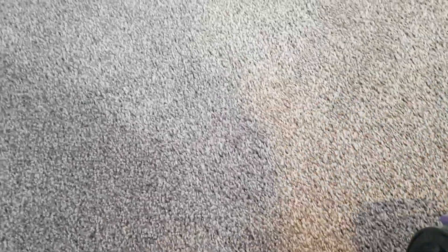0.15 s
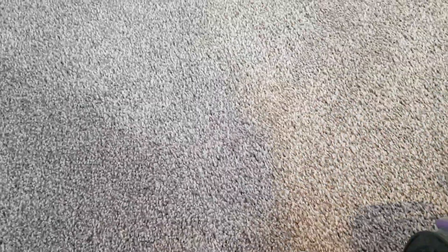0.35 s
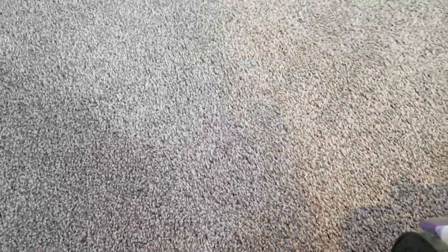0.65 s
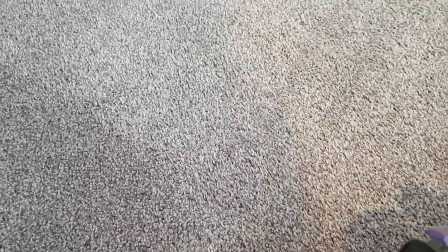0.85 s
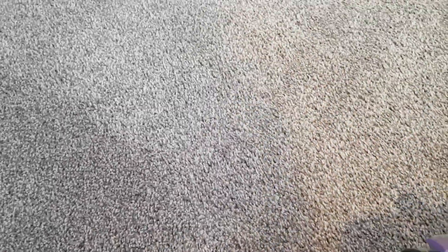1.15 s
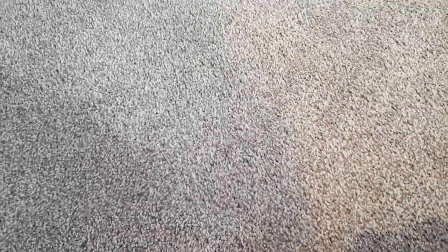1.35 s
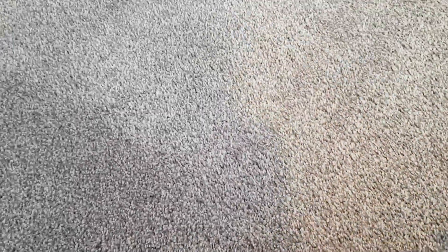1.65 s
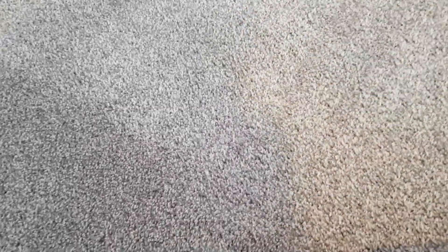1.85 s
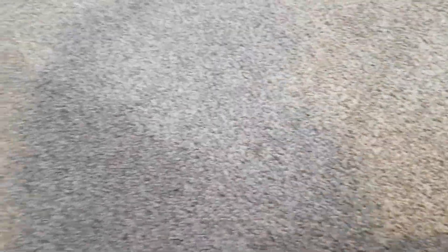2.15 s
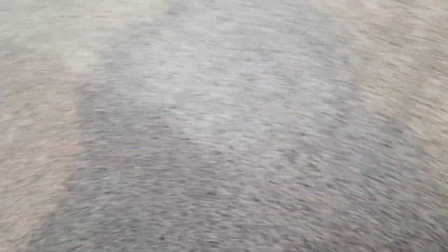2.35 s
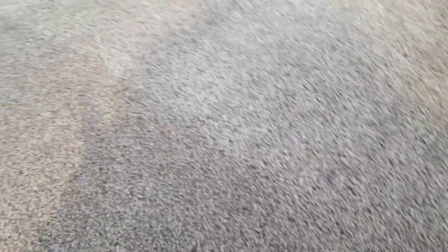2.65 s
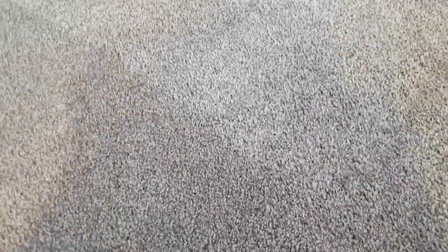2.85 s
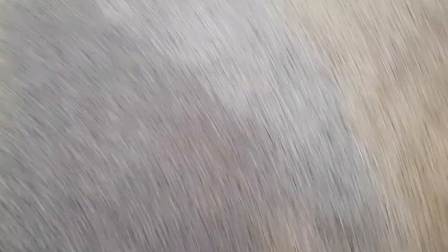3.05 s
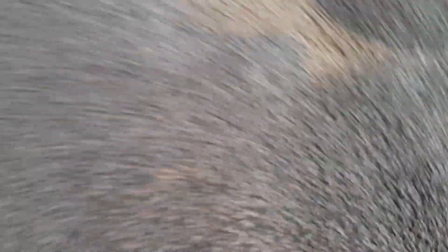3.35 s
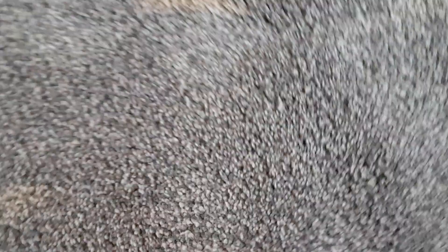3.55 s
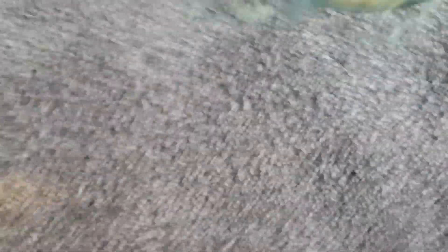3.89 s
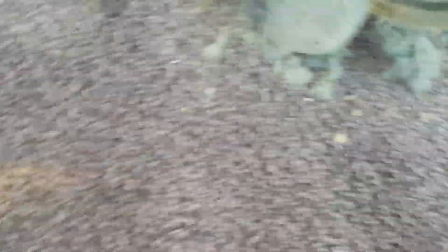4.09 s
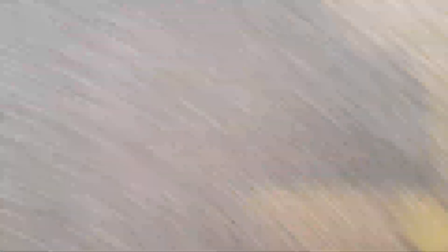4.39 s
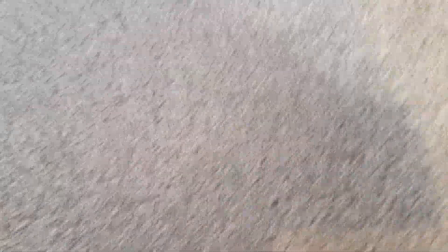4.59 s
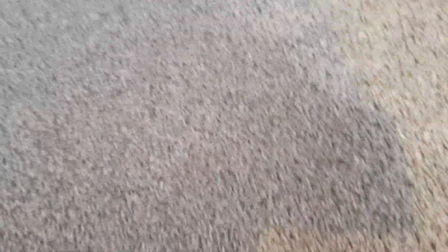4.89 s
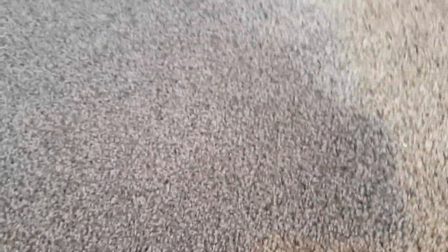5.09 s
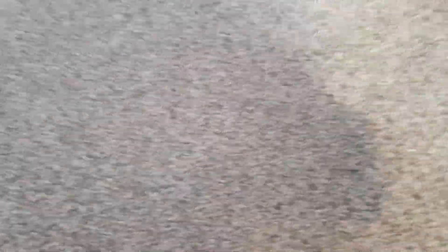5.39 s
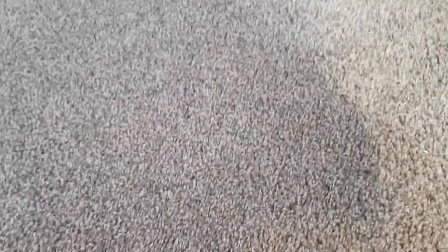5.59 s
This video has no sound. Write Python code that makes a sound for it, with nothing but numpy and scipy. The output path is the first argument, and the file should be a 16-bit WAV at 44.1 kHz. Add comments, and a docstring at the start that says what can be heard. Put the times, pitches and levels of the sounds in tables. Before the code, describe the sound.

Faint rustles and plastic ticks, then a sharp snap of a catch and rattling knocks as a silent vacuum cleaner is handled.

```python
"""Handling a switched-off vacuum cleaner

An upright vacuum cleaner is shifted about on carpet in a quiet home, close to the listener.
Its plastic shell knocks and ticks, a catch snaps home with a loud clack and loose parts rattle,
all ringing the same body modes. Cloth and carpet rustle. The room answers each knock, over a bed
of faint mains hum, a distant drone and hiss."""
import sys
import numpy as np
from scipy import signal
from scipy.fft import rfft, irfft, next_fast_len
from scipy.io import wavfile
from scipy.ndimage import map_coordinates

SR = 44100
rng = np.random.default_rng(int(sys.argv[2]) if len(sys.argv) > 2 else 0)


def unload_wav(signal):
    """Save mono or channel-first audio to the path in sys.argv[1] as 16-bit WAV at rate SR, clipped to [-1, 1]."""
    wavfile.write(
        sys.argv[1],
        SR,
        np.round(np.clip(np.atleast_2d(signal).T, -1, 1) * 32767).astype(np.int16),
    )


N = 252693

# The modes the machine rings with, before a grip damps them: pitch_hz, level_db, t60_s
BODY_MODES = [(111, 11.5, 0.035), (133.6, 1, .16), (163, 1, 0.1), (230, -2, 0.077), (290, 2.5, 0.088),
              (430, -2.5, 0.16), (500, 3.5, 0.068), (546.3, 1.5, 0.12), (650, 1.5, 0.11), (740, 2, .17),
              (865, -3, 0.042), (920, 2.5, 0.28), (1077, 1, 0.09), (1292, -2, .05), (1650, -8.5, 0.11),
              (1670, -4.5, 0.066), (2223, -10.5, 0.017), (2457, 3, 0.031), (2660, 0.5, 0.039),
              (2830, 1, 0.087), (3225, 1.5, 0.032), (3790, 7.5, 0.035), (4583, 7, 0.035), (5400, -1, 0.014),
              (7130, -8.5, 0.055), (8480, 1, .05), (11100, -7, .015), (14660, -0.5, .12)]
# Band limits of its five parts (base, shell, catch, clips, edges): limit_hz
PART_LIMITS_HZ = [60, 250, 1100, 4000, 8000, 15000]
# Where the machine sits in the stereo image: time_s, left_lag_ms, left_over_right_db
BEARING = [(0, 0.066, 3), (2.5, 0.17, -0.5), (3.7, .1, 3.5), (3.75, -0.18, 2), (3.85, -0.14, 3.5),
           (3.87, .05, -2), (3.89, -0.088, 3), (4.0, -0.089, 1.5), (4.09, 0.34, -1), (5.73, 0.41, .5)]


def knocks():
    """Each contact is a blow and a grinding burst of force; it rings the modes near the spot's pitch."""
    # Contacts: start_s, thud_db, shell_db, clack_db, tick_db, shell_hz, clack_hz, grind_s
    contacts = [(1.1958, -62, -54.5, -65, -83, 290, 1204, .015),
                (1.2254, -73, -69, -61, -94, 510, 1900, .021),
                (1.2314, -62, -60, -57, -78, 750, 2960, 0.14),
                (1.2505, -55, -36, -37, -49, 775, 2110, 0.011),
                (1.2715, -73, -50, -44.5, -57, 800, 1292, .03),
                (1.6188, -72, -62.5, -62, -97, 650, 1160, 0.065),
                (1.6504, -85, -64, -68, -84, 720, 1630, 0.045),
                (1.9454, -67.5, -66.5, -64, -86, 250, 2310, 0.024),
                (2.151, -80, -73, -65, -91, 380, 2800, 0.02),
                (2.339, -62, -56.5, -76, -74, 282, 1230, 0.029),
                (2.5613, -56.5, -57, -63, -76, 430, 2100, 0.018),
                (2.5874, -79, -65, -70, -80, 660, 1230, .045),
                (2.6879, -63, -62, -67, -76, 248, 1430, 0.06),
                (2.891, -79, -64, -69, -85, 740, 1430, 0.029),
                (2.9609, -68.5, -60, -67.5, -91, 583, 1240, 0.023),
                (3.315, -74, -63.5, -77, -74.5, 457, 1580, 0.027),
                (3.7043, -45.5, -44, -49, -57, 550, 1110, 0.18),
                (3.7098, -49, -43.5, -45.5, -60, 636, 1080, 0.033),
                (3.7538, -56, -51, -39, -81, 332, 1350, 0.0061),
                (3.7797, -61, -42.5, -41, -58, 1070, 1140, 0.06),
                (3.793, -50.5, -41, -36, -50.5, 516, 2060, 0.06),
                (3.8243, -45, -41.5, -36, -34.5, 250, 3250, .006),
                (3.8586, -52, -44, -54, -49, 930, 3770, 0.12),
                (3.8665, -62, -39.5, -23.5, -47, 895, 3790, 0.0088),
                (3.8769, -35, -27.5, -27.5, -42, 480, 1780, 0.074),
                (3.8941, -45, -19, -13, -27, 926, 2920, .04),
                (3.942, -57.5, -33, -35, -39, 480, 2840, 0.047),
                (3.9779, -45, -33.5, -33.5, -45, 506, 2730, 0.018),
                (3.991, -68, -58, -41, -38, 490, 3200, 0.046),
                (4.0078, -49, -60, -44, -52.5, 920, 2810, 0.022),
                (4.051, -61, -52, -47.5, -58.5, 1080, 2790, .037),
                (4.0571, -52, -53, -48.5, -55, 1080, 1270, 0.016),
                (4.0865, -63, -77, -60.5, -57, 895, 2820, 0.042),
                (4.1171, -78, -70, -63.5, -65.5, 423, 2970, .08),
                (4.1496, -82, -76.5, -51.5, -59.5, 290, 4280, .027),
                (4.263, -64, -49, -62.5, -71, 740, 2790, .08),
                (4.3285, -62.5, -50, -55.5, -70, 303, 2830, 0.024),
                (4.4175, -68, -69, -61.5, -66, 684, 2820, 0.25),
                (4.435, -61, -45.5, -50, -63, 554, 2457, 0.11),
                (4.5068, -73.5, -73, -51, -56.5, 419, 2830, .032),
                (4.6932, -72, -53, -56.5, -85.5, 688, 1390, 0.021),
                (4.768, -77, -53.5, -59.5, -84.5, 525, 1650, 0.021),
                (4.794, -71, -51.5, -60, -74, 563, 1250, 0.04),
                (4.8375, -43.5, -44, -49.5, -64, 650, 1260, 0.062),
                (4.852, -49.5, -52, -51, -61, 290, 1700, 0.052),
                (4.908, -65.5, -65, -68, -77, 247, 1970, 0.091),
                (5.019, -50, -44.5, -42.5, -66, 684, 2830, 0.042),
                (5.026, -48, -46, -42, -64, 290, 2660, 0.0378),
                (5.0491, -52, -41.5, -36.5, -66, 500, 2700, 0.022),
                (5.082, -66, -47.5, -47.5, -79, 487, 1670, 0.023),
                (5.119, -61, -45.5, -47.5, -92.5, 745, 2660, 0.21),
                (5.1761, -66, -56, -58, -88, 520, 1650, 0.012),
                (5.2335, -63, -53.5, -48, -76.5, 370, 2660, 0.063),
                (5.344, -71.5, -60.5, -64.5, -88.5, 352, 1120, 0.039),
                (5.4072, -39, -45, -51.5, -66, 652, 2530, 0.083),
                (5.4395, -44, -42.5, -38.5, -76, 500, 2600, 0.11),
                (5.4653, -56, -42.5, -43.5, -91, 520, 2800, 0.051),
                (5.5207, -66, -52.5, -51.5, -95, 710, 2550, .046),
                (5.5467, -62, -53.5, -56.5, -94, 305, 1670, 0.068),
                (5.6178, -54, -49.5, -55, -70, 690, 2660, 0.056),
                (5.6305, -50.5, -53.5, -42.5, -60.5, 290, 2840, 0.045),
                (5.6525, -56, -41.5, -40.5, -67, 635, 1950, 0.17)]
    # How the machine stands after each shift: start_s, thud_hz, freedom_to_ring (0-1)
    stances = [(0, 160, 0.4), (3.8, 106.6, 0.69), (4.2, 244, 0.54), (4.82, 127, 0.37)]
    usual_tick_db, usual_clack_db = -58, -44
    thud_delay = round(0.006 * SR)  # the base meets the carpet just after the contact
    # One row a part, base to edges; left and right hear different sides of the small bright parts.
    spread = np.array([[0.05], [0.12], [0.25], [0.45], [0.45]])
    grind_scale = np.array([[1.1], [1.1], [0.9], [0.75], [0.6]])
    grit_db = np.array([[-11], [-7], [-1.5], [1.5], [4]])
    out, t = np.zeros((2, N + SR)), np.arange(SR // 3) / SR
    mode_hz = np.transpose(BODY_MODES)[0]
    scatters_db = 2 * rng.standard_normal((len(contacts), len(BODY_MODES)))
    bursts = rng.standard_normal((len(contacts), 2, 5, len(t)))
    lag_ms, pan_db = curves(BEARING)
    for contact, scatter_db, burst in zip(contacts, scatters_db, bursts):
        start_s, thud_db, shell_db, clack_db, tick_db, shell_hz, clack_hz, grind_s = contact
        _, thud_hz, freedom = [stance for stance in stances if stance[0] <= start_s][-1]
        fizz_db = usual_tick_db - 6.5 + 0.91 * (tick_db - usual_tick_db)  # edges fizz under the tick
        levels_db = np.array([thud_db, shell_db, clack_db, tick_db, fizz_db])
        # A weak tick means a soft, slow contact; a loud clack means a hard, fast one.
        softness = (shell_db - tick_db) / 17.5 - (clack_db - usual_clack_db) / 25.5
        rise_s = np.clip(0.00058 * 2 ** softness, 0.0002, 0.005)
        t60_s = np.clip(grind_s, 0.004, 0.15) * grind_scale
        mid, side = burst * amp(-60 * t / t60_s) * (1 - np.exp(-t / rise_s))
        blow = mid / np.linalg.norm(mid, axis=1, keepdims=True)
        blow[:, 0] = 0.0033 / rise_s  # the sharper the contact, the harder its first blow
        octaves_off = np.min([abs(np.log2(mode_hz / hz)) for hz in (thud_hz, shell_hz, clack_hz)], axis=0)
        excite_db = -19 * octaves_off * (mode_hz < PART_LIMITS_HZ[3]) + scatter_db
        ring = unit_attack(filtered(blow, lambda f: body_ring(f, excite_db, freedom)))
        at = round(start_s * SR)
        for channel, sign in enumerate((1, -1)):
            grit = unit_attack(filtered(mid + sign * spread * side, crunch))
            parts = unit_attack(ring + amp(grit_db) * grit)
            parts[0] = np.pad(parts[0], (thud_delay, 0))[:len(t)]
            arrival = round((start_s + sign * lag_ms[at] / 2000) * SR)  # half the lag each side
            out[channel, arrival:][:len(t)] += amp(levels_db + sign * pan_db[at] / 2) @ parts
    return out[:, :N]


def rattle():
    """Loose parts chatter and scrape: dense, uneven grains of force into the same body."""
    # Swell of the rattle: time_s, level_db, treble_offset_db
    swell = [(3.66, -76, -3), (3.78, -47, -25.5), (3.845, -59, -20.5), (3.88, -50, -5), (3.96, -48, 2),
             (4.03, -45.5, -11), (4.1, -68, 4), (4.18, -79.5, 5), (4.55, -76, -6), (4.77, -63, -17),
             (4.92, -62, -5), (5.01, -71.5, -6.5), (5.19, -69.5, -18.5), (5.48, -68, -18), (5.73, -49, -22)]
    # Balance of shell, catch, clips and edges: gain_db
    balance_db = [-5.5, -8, -8.5, -9.5]
    grains = rng.standard_normal((5, N)) * amp(3.5 * wobble(90) + 1.9 * wobble(28))
    rings = filtered(grains, lambda f: body_ring(f, np.zeros(len(BODY_MODES)), freedom=0.22))
    scrapes = filtered(grains, crunch)
    level_db, treble_db = curves(swell, outside=-120)
    levels_db = [level_db, level_db, level_db + treble_db, level_db + treble_db]
    chatter = sum(amp(db + part_db) * (unit(ring) + amp(-1) * unit(scrape))
                  for db, part_db, ring, scrape in zip(levels_db, balance_db, rings[1:], scrapes[1:]))
    half_lag = curves(BEARING)[0] * SR / 2000  # samples; follows the machine's bearing
    return np.array([map_coordinates(chatter, [np.arange(N) - sign * half_lag]) for sign in (1, -1)])


def body_ring(f, excite_db, freedom):
    """The modal response of each part; a grip shortens the ring of all but the base."""
    parts = np.zeros((5, len(f)), complex)
    for k, (hz, db, t60_s) in enumerate(BODY_MODES):
        ring_scale = 1 if hz < PART_LIMITS_HZ[1] else np.clip(freedom, 0.1, 1.5)
        width_hz = np.log(1000) / (np.pi * t60_s * ring_scale)
        part = np.searchsorted(PART_LIMITS_HZ, hz) - 1
        parts[part] += (-1) ** k * amp(db + excite_db[k]) * resonance(f, hz, width_hz)
    return parts * radiation(f)


def crunch(f):
    """The broad, heavily damped response of each part."""
    bands = zip(PART_LIMITS_HZ, PART_LIMITS_HZ[1:])
    return [resonance(f, np.sqrt(lo * hi), 1.13 * (hi - lo)) ** 2 for lo, hi in bands] * radiation(f)


def resonance(f, hz, width_hz):
    """One resonance whose ring starts at the same strength whatever its width."""
    return 1j * f / (hz * hz - f * f + 1j * f * width_hz)


def radiation(f):
    """Each part radiates little far above or below its own band."""
    low_hz, high_hz = 0.96 * np.array([PART_LIMITS_HZ[:-1], PART_LIMITS_HZ[1:]])[..., None]
    return 1j * f / (low_hz + 1j * f) / (1 + 1j * f / high_hz) ** 2


def rustle():
    """Cloth rubs in short strokes: a swish, a duller drag and a fine hiss, all grainy."""
    # Cloth strokes: start_s, length_s, level_db, drag_offset_db, hiss_offset_db
    strokes = [(.365, 0.062, -68.5, -7, -8), (0.547, 0.034, -75, -2, -17), (1.528, 0.047, -76, -4, -5),
               (1.722, 0.029, -72.5, -3, -8.5), (2.205, 0.036, -76, -19, 7),
               (2.338, 0.019, -69.5, 1.5, -11), (2.453, 0.06, -63, -1, -6.5), (2.64, 0.047, -65, 2, -2),
               (2.897, 0.044, -77.5, -2, -8), (3.308, 0.01, -82.5, -4.5, 9.5),
               (3.514, 0.039, -78, -9, -11.5)]
    # Tone colours of the three layers: frequency_hz, density_db
    swish = [(1200, -30), (1900, -5), (2500, 0), (3600, -2), (4400, -14), (7000, -35)]
    drag = [(400, -13.5), (800, -5), (1400, -10), (2000, -2), (3000, -23)]
    hiss = [(3000, -17.5), (5500, -3), (8000, 0), (10000, -11), (12500, 0), (16000, -9.5)]
    rise_s, fade_lengths = 0.075, 7.6  # to climb and to fall by 60 dB
    t, gains = np.arange(N) / SR, np.zeros((3, N))
    for start_s, length_s, level_db, drag_db, hiss_db in strokes:
        attack_db = -60 * np.maximum(start_s - t, 0) / rise_s
        release_db = -60 * np.maximum(t - start_s - length_s, 0) / (fade_lengths * length_s)
        gains += amp(level_db + attack_db + release_db + np.array([[0], [drag_db], [hiss_db]]))
    grain = amp(1.3 * wobble(86))
    return grain * sum(gain * stereo_noise(colour) for gain, colour in zip(gains, (swish, drag, hiss)))


def room_echo(x):
    """A short reverb whose treble dies first; the echo pattern keeps shifting, as for a moving source."""
    # Decay of the room: frequency_hz, t60_s
    decay = [(100, 0.4), (500, 0.18), (2000, 0.15), (8000, 0.091), (15000, 0.066)]
    hz, t, noise = signal.stft(rng.standard_normal((6, 2, SR // 2)), SR, nperseg=256)
    tails = signal.istft(noise * amp(-60 * t / along(decay, hz)[:, None]), SR, nperseg=256)[1]
    tails /= np.linalg.norm(tails, axis=2, keepdims=True)
    active = np.arange(N) // (SR // 100) % len(tails)  # the next tail is fed every 10 ms
    wet = sum(signal.fftconvolve(x * (active == k), tail, axes=1) for k, tail in enumerate(tails))
    wet += filtered(wet.mean(0) - wet, lambda f: 1 / (1 + 1j * f / 150))  # long waves reach both sides alike
    return np.pad(wet, ((0, 0), (200, 0)))[:, :N]  # pre-delay


def room_tone():
    """The background bed: wavering mains hum, a distant drone, low rumble and microphone hiss."""
    # Hum partials near multiples of the mains: pitch_hz, rms_db
    partials = [(102.3, -82), (199.2, -85), (301.5, -84), (597.5, -87), (699.8, -85)]
    # The drone swells and fades: time_s, level_db
    swell = [(0.0, -78), (0.49, -79), (0.66, -69), (1.21, -92), (1.4, -76.5), (2.02, -71.5), (2.41, -78.5),
             (2.65, -68.5), (3.03, -80.5), (3.68, -74.5)]
    # Tone colours of rumble, hiss and drone: frequency_hz, density_db
    rumble_colour = [(12, -33.5), (20, -6.5), (27, -16), (97, -8.5), (129, -12.5), (297, -10.5),
                     (326, -19.5), (395, -12), (514, -14.5), (684, -9.5), (828, -14.5), (1580, -15.5),
                     (2370, -18.5), (6000, -30), (7800, -65.5), (13200, -120)]
    hiss_colour = [(3530, -25.5), (6000, -5), (9800, -4), (13400, -1), (15100, -0.5), (16100, -4),
                   (16500, -22.5)]
    drone_colour = [(250, -44), (330, -8), (380, -3.5), (470, -10), (600, -40)]
    t = np.arange(N) / SR
    hum = sum(np.sqrt(2) * amp(db + 1.4 * wobble(9.9)) * np.sin(2 * np.pi * hz * t + wobble(8.9))
              for hz, db in partials)
    drone = amp(curves(swell)[0] + 2.5 * wobble(12)) * stereo_noise(drone_colour)
    rumble = amp(-69 + 0.48 * wobble(2.6)) * stereo_noise(rumble_colour)
    hiss = amp(-78) * stereo_noise(hiss_colour)
    return rumble + hiss + hum + drone


def stereo_noise(colour):
    """Coloured noise at rms 1, as alike left and right as the room makes it."""
    # Likeness of left and right: frequency_hz, correlation
    likeness = [(60, 0.86), (150, 0.16), (380, 0.6), (950, 0.19), (2380, -0.015), (5980, -0.16),
                (15000, -0.21)]

    def mid_side_gains(hz):
        angle = np.arccos(np.clip(along(likeness, hz), -1, 1)) / 2
        return amp(along(colour, hz)) * [np.cos(angle), np.sin(angle)]

    mid, side = filtered(rng.standard_normal((2, N)), mid_side_gains)
    return unit(np.array([mid + side, mid - side]))


def amp(db):
    """Gain of a dB value."""
    return 10 ** (np.asarray(db) / 20)


def unit(x):
    """x at rms 1."""
    return x / np.sqrt(np.mean(x ** 2) + 1e-20)


def unit_attack(x):
    """Each row at rms 1 over its first 1/60 s."""
    return x / np.sqrt(np.mean(x[:, :SR // 60] ** 2, axis=1, keepdims=True))


def along(points, hz):
    """Read (frequency_hz, value) points on a log frequency axis."""
    point_hz, values = np.transpose(points)
    return np.interp(np.log(hz + 1), np.log(point_hz + 1), values)


def curves(rows, outside=None):
    """One value per sample for each column after the time."""
    time_s, *columns = np.transpose(rows)
    return [np.interp(np.arange(N) / SR, time_s, column, outside, outside) for column in columns]


def wobble(rate):
    """A smooth random curve, rate knots a second."""
    return map_coordinates(rng.standard_normal(int(N * rate / SR) + 4), [np.arange(N) * rate / SR])


def filtered(x, response):
    """x through a complex frequency response."""
    length = x.shape[-1]
    padded = next_fast_len(length + SR // 4)
    return irfft(rfft(x, padded) * response(np.fft.rfftfreq(padded, 1 / SR)), padded)[..., :length]


def scene():
    """The machine, its echo in the room, cloth and room tone."""
    machine = knocks() + rattle()
    return machine + amp(-8) * room_echo(machine) + rustle() + room_tone()


def record(dry):
    """The loudest peaks are rounded off and the extreme treble is cut."""
    ceiling, top_hz, dc_offset = 0.9, 15900, -0.0004
    rounded = dry / (1 + np.abs(dry / ceiling) ** 6) ** (1 / 6)
    return filtered(rounded, lambda hz: hz < top_hz) + dc_offset


dry = scene()
out = record(dry)
unload_wav(out)
```